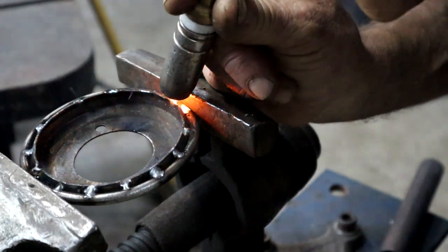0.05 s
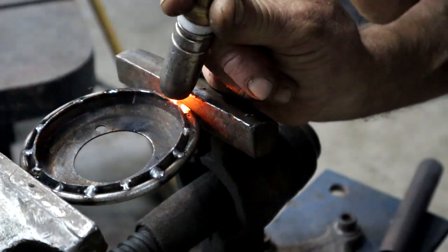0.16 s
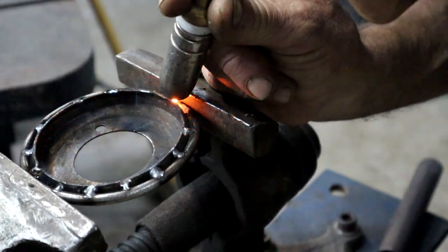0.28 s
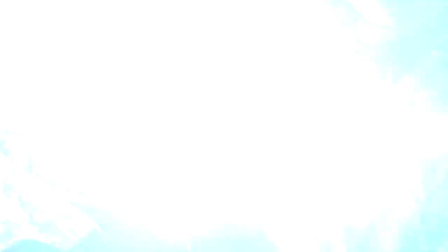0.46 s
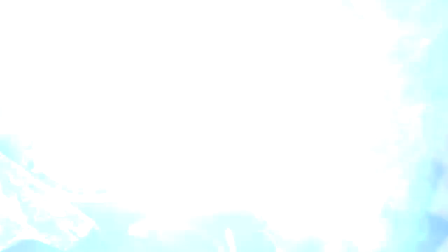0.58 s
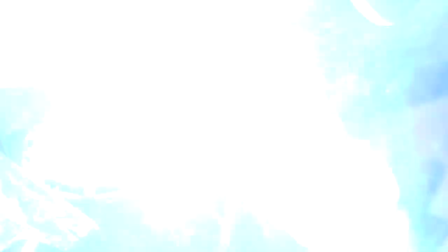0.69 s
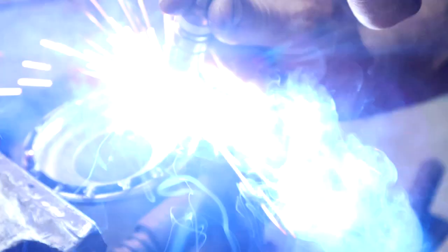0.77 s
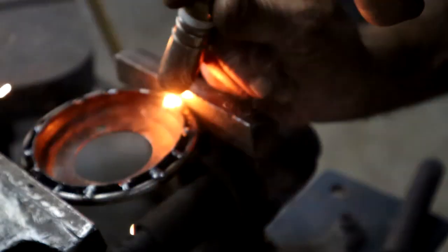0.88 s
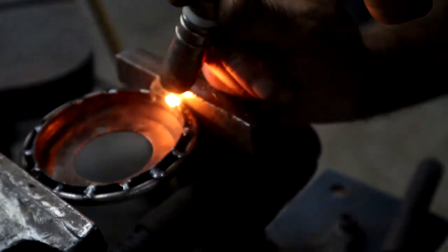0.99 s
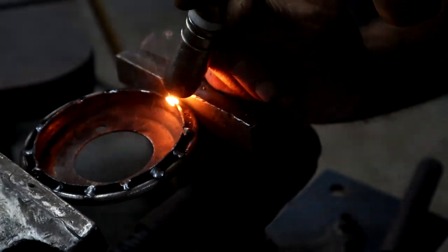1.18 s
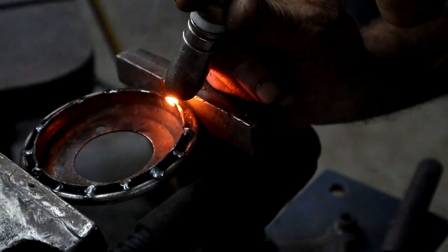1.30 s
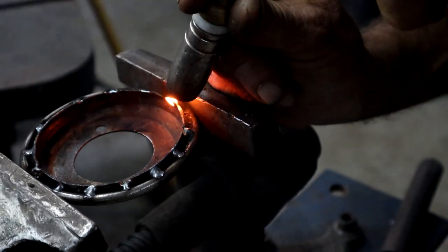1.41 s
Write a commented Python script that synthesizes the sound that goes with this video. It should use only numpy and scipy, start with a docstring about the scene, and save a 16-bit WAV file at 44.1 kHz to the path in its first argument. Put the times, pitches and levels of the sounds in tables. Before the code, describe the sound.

Arc welding close up in a workshop: faint machine hum, a rush of whistling shielding gas, then loud irregular snapping pops and gritty sizzle, ending with a soft gas puff and quiet hum; close, overloaded stereo microphone.

```python
"""A machine hums in a workshop; then shielding gas surges from a MIG torch and whistles in its pipe modes.
The arc catches with a hollow low knock in its first pop, then sputters in sharp pops while it fries; a gas puff fades.
Hum is wandering sines; gas is noise through resonances; the arc is pressure pulses, noise bursts and gritty noise.
A decaying-noise room answers gas and arc. Peaks drive a gain control, and the microphone overloads softly."""
import sys
import numpy as np
from scipy import signal
from scipy.fft import rfft, irfft, next_fast_len
from scipy.io import wavfile
from scipy.ndimage import minimum_filter1d, map_coordinates

SR = 44100
rng = np.random.default_rng(int(sys.argv[2]) if len(sys.argv) > 2 else 0)


def generate_wav(signal):
    """Clip the signal to [-1, 1] and save it as 16-bit WAV at the path in sys.argv[1]."""
    frames = np.transpose(np.atleast_2d(signal))
    scaled = np.clip(frames, -1, 1) * 32767
    pcm = np.round(scaled).astype(np.int16)
    wavfile.write(sys.argv[1], SR, pcm)


N = 63945  # samples

# Spectra are relative: each noise is scaled to rms 1 before its level is applied.
# Likeness is the left-right correlation, from -1 (opposite) to 1 (equal).

# Workshop background spectrum: (frequency [Hz], level [dB])
SHOP_COLOUR = [(25, -34), (60, -22), (100, -24.5), (155, -6), (213, -13), (257, -6.5), (335, -11),
               (515, -10.5), (640, -14.5), (1000, -14), (2430, -20.5), (3440, -36), (4400, -31),
               (10300, -50.5), (15000, -83)]
# Workshop background stereo: (frequency [Hz], likeness [-1 to 1])
SHOP_LIKENESS = [(60, 0.97), (250, 0.94), (600, 0.75), (1500, 0.067), (5000, 0.045)]
# Partials of the machine hum: (frequency [Hz], level [dB])
HUM_PARTIALS = [(165, -47), (198, -60.5), (259, -44.5), (296, -48), (511, -52.5), (878, -53), (1019, -50.5)]
SHOP_DB = -35.5

# Gas flow envelope: (time [s], level [dB])
GAS_LEVEL = [(.205, -92), (.212, -28.5), (.226, -26), (.283, -15.5), (.347, -15.5), (.368, -33),
             (.40, -6.5), (.435, -11), (.505, -15), (.53, -19), (.62, -52), (.82, -54), (.9, -89)]
# Nozzle pipe modes: (frequency [Hz], width [Hz], level [dB])
NOZZLE_MODES = [(1766, 360, -2), (5355, 600, -5.5), (8440, 780, -14), (9580, 530, -15), (11000, 900, -33)]
# Spans in which the nozzle sounds: (start [s], end [s], level of upper modes [dB])
SPEAKING_SPANS = [(0.224, .353, 1), (0.409, .525, -1.5)]
# Jet hiss spectrum: (frequency [Hz], level [dB])
JET_COLOUR = [(150, -42), (600, -28), (1200, -13), (2400, 0), (3600, -6), (5000, -15), (7000, -3.5),
              (9000, 2.5), (12000, 2.5), (13500, -11), (15500, -33)]
# Gas stereo: (frequency [Hz], likeness [-1 to 1])
GAS_LIKENESS = [(600, 0.22), (1800, 1), (3100, 0.27), (5300, 0.86), (8000, -0.21), (14000, -0.63)]
JET_DB, WHISTLE_DB = -6.5, -14  # relative to the gas envelope
WHISTLE_HZ, WHISTLE_WANDER = 1767, 0.0326  # centre; wander as a fraction of it
SPEAK_EDGE_S, MUTE_DB = 0.0064, -16.5  # speed of the span edges; nozzle level outside the spans
UPPER_HZ = 3200  # modes above this are the upper ones

# Room decay: (frequency [Hz], T60 [s])
ROOM_T60 = [(200, 0.25), (1500, 0.52), (5000, 0.88), (10000, 0.54), (15000, 0.24)]
# Room tail spectrum: (frequency [Hz], level [dB])
ROOM_COLOUR = [(100, -27), (450, -26), (900, 3.5), (1500, -3.5), (3000, -0.5), (6000, -1), (9500, 6.5),
               (11800, -0.5), (13200, 9), (15000, -26)]
# Room stereo: (frequency [Hz], likeness [-1 to 1])
ROOM_LIKENESS = [(200, 0.48), (550, 0.84), (1650, -0.28), (5000, -0.6), (15000, -0.65)]
ARC_WET_DB, GAS_WET_DB, ROOM_BUILD_S = -8, -7, 0.034

# Frying arc envelope: (time [s], level [dB])
FRY_LEVEL = [(.343, -70), (.35, -8), (.365, -8.5), (.41, -19), (.5, -31), (.515, -11.5), (.55, -8.5),
             (.59, -20.5), (.66, -13.5), (.79, -15.5), (.82, -29), (.89, -55)]
# Frying arc spectrum: (frequency [Hz], level [dB])
FRY_COLOUR = [(30, -26), (130, 3), (400, -2.5), (1800, 1.5), (3500, -5), (5300, -1.5), (7000, -7.5),
              (10000, -4), (11500, 0), (13000, -12), (15500, -19.5)]
# Arc stereo: (frequency [Hz], likeness [-1 to 1])
ARC_LIKENESS = [(250, 0.72), (2000, -0.34), (6000, -0.24), (12000, 0.035)]

# Wire touches that spit: (time [s], level [dB])
TOUCHES = [(0.3434, -3.5), (0.5073, -2), (0.524, 6.5), (0.5322, -14), (0.5564, -7)]
TOUCH_T60_S = 0.0078

# Arc strikes; the near side is shorter and the far side longer than the nominal length:
# (time [s], push [dB], crack [dB], nominal push length [ms], opening spike over push [ratio], left-right [dB])
POPS = [(0.3488, 9, 9.5, 0.5, 0.81, 10), (0.5104, 6.5, 2.5, 0.66, 1.5, 1), (.5342, 16, 7, 0.46, 1.54, -2.5),
        (0.5491, 11.5, 1.5, 0.58, 1.4, 5.2), (0.5671, 8.5, 4.5, 0.51, 1.53, 3.5),
        (0.6106, 10, 10, 0.85, 2.07, 6), (.6435, 13, 3.5, 0.46, 1.35, 7.5), (.6620, 12, 2, 0.4, 1.33, 6.5),
        (0.6808, 15, 3.5, 0.29, 1.2, 7), (0.7078, 15.5, 5.5, 0.34, 1.02, 6.5),
        (.7596, 21, 5.5, 0.27, 0.99, 5.5), (0.7791, 9.5, 1, 0.45, .9, 8)]
# Reversed pulses: the first is the short return swing of the opening pop, the others longer, dull thuds:
# (time [s], pull [dB], crack [dB], nominal pull length [ms], opening spike over pull [ratio], left-right [dB])
REVERSED_PULSES = [(.3499, 9, 4, 0.27, 1.3, 3.5), (.5269, 16.5, -2.5, 1.7, 0.52, 1.5),
                   (.5421, 9, -17, 1.5, 0.99, 0), (0.7301, -3, -10.5, 2.1, 1.5, -9),
                   (0.8021, 7, 0.5, 2.1, 0.68, -5.5)]
# Spectrum of cracks and spits: (frequency [Hz], level [dB])
CRACK_COLOUR = [(300, -3), (1000, -4), (1600, -6.5), (2600, -2), (3600, -4.5), (4500, -11), (6300, -12.5),
                (7200, -5), (9000, -13), (10500, -11.5), (11400, 5.5), (12400, -13), (15500, -13.5)]
FRONT_MS = 0.15  # nominal time to the peak of the opposite opening spike
CRACK_T60_S, CRACK_HOLD_S = 0.0066, 0.00024
TICK_LEAD_S, TICK_DB, TICK_T60_S = 0.0024, -8.5, 0.0018  # a tick just before each pulse
MIC_LOW_HZ = 80.6  # the microphone's bass limit

# Knock in the first pop: (frequency [Hz], level [dB], T60 [s])
KNOCK_MODES = [(408, 7, 0.018), (835, -1, .022)]
KNOCK_S = .3488  # with the first pop

# Droplet spectrum: (frequency [Hz], level [dB])
SPATTER_COLOUR = [(500, -27), (1300, 2), (3500, -6), (5000, -7), (15000, -31)]
SPATTER_DB, SPATTER_T60_S, SPATTER_GRIT_DB = -19.5, 0.054, 8.5  # level is relative to each crack

# Last gas puff spectrum: (frequency [Hz], level [dB])
PUFF_COLOUR = [(150, -43), (500, -12), (900, -6), (1500, 6), (2500, 1), (3800, -3), (5500, 1), (9000, -0.5),
               (11200, -1), (12600, -4), (14000, -38)]
PUFF_S, PUFF_DB, PUFF_RISE_DB_PER_S, PUFF_FALL_DB_PER_S = 0.897, -17, 263, 141  # peak time and level

THRESHOLD_DB, DEPTH_DB = 2, 17.5  # gain control: onset; limit of the fast stage's cut
ATTACK_S, HOLD_S, RELEASE_DB_PER_S = 0.0051, .05, 152
MEMORY_S, MEMORY_GAIN = 1.56, 1.89  # its slow stage
TOP_HZ = 15750  # band limit


def amp(db):
    """Level law: decibels to amplitude ratio."""
    return 10 ** (np.asarray(db) / 20)


def unit(x):
    """Power normalisation: scale to rms 1."""
    return x / np.sqrt(np.mean(x ** 2) + 1e-20)


def along(points, hz):
    """Logarithmic frequency interpolation of (Hz, value) points."""
    f, v = np.transpose(points)
    return np.interp(np.log(hz + 1), np.log(f + 1), v)


def curve(rows):
    """Linear time interpolation of (s, value) points."""
    return np.interp(np.arange(N) / SR, *np.transpose(rows))


def wobble(rate):
    """Smooth random modulation: a spline through `rate` random knots a second."""
    knots = rng.standard_normal(4096)
    return map_coordinates(knots, [np.arange(N) * rate / SR], mode="wrap")


def filtered(x, response):
    """Linear filtering: multiply the spectrum by a response of frequency."""
    m = next_fast_len(N + SR // 2)
    return irfft(rfft(x, m) * response(np.fft.rfftfreq(m, 1 / SR)), m)[..., :N]


def noise(colour, likeness):
    """Partial coherence: coloured stereo noise of rms 1 from independent mid and side."""
    def mid_side_response(hz):
        turn = np.arccos(np.clip(along(likeness, hz), -1, 1)) / 2
        return amp(along(colour, hz)) * [np.cos(turn), np.sin(turn)]

    mid, side = filtered(rng.standard_normal((2, N)), mid_side_response)
    return unit(np.array([mid + side, mid - side]))


def tone(hz, wander, rate):
    """Frequency modulation: a sine of rms 1 with randomly wandering pitch."""
    cycles = np.cumsum(hz * (1 + wander * wobble(rate))) / SR
    return np.sqrt(2) * np.sin(2 * np.pi * cycles)


def burst(t, hold, t60):
    """Exponential decay after a sudden start and a short hold."""
    return (t >= 0) * amp(-60 * np.maximum(t - hold, 0) / t60)


def hump(u):
    """Rounded pressure pulse that peaks at u = 1."""
    return u * np.exp(1 - u)


def shop():
    """Superposition: wavering machine partials add to broadband air rush."""
    hum = sum(amp(db + 2.6 * wobble(15.2)) * tone(hz, wander=0.01175, rate=28) for hz, db in HUM_PARTIALS)
    return hum + amp(SHOP_DB) * noise(SHOP_COLOUR, SHOP_LIKENESS)


def pipe_response(hz):
    """Resonance: the power of the nozzle's pipe modes adds."""
    power = sum(amp(db) ** 2 / (1 + np.abs(2 * (hz - centre) / width) ** 3.02)
                for centre, width, db in NOZZLE_MODES)
    return np.sqrt(power)


def gas():
    """Flow-excited resonance: a jet hisses, noise sounds the pipe modes; near the lowest a tone whistles."""
    t = np.arange(N) / SR
    gates = [(np.tanh((t - on) / SPEAK_EDGE_S) - np.tanh((t - off) / SPEAK_EDGE_S)) / 2
             for on, off, _ in SPEAKING_SPANS]
    upper_db = sum(gate * db for gate, (_, _, db) in zip(gates, SPEAKING_SPANS))
    modes = unit(filtered(noise([(1000, 0)], GAS_LIKENESS), pipe_response))  # from white noise
    upper = filtered(modes, lambda hz: hz > UPPER_HZ)
    whistle = amp(WHISTLE_DB + 1.3 * wobble(90)) * tone(WHISTLE_HZ, WHISTLE_WANDER, rate=430)
    speaking = amp(MUTE_DB * (1 - sum(gates)))
    nozzle = speaking * (modes - upper + amp(upper_db) * upper + whistle)
    jet = amp(JET_DB) * noise(JET_COLOUR, GAS_LIKENESS)
    return amp(curve(GAS_LEVEL) + 1.02 * wobble(200.9)) * (nozzle + jet)


def room(x):
    """Reverberation: the left input meets a noise tail that builds up, then decays at a rate set by frequency."""
    hz, t, z = signal.stft(noise(ROOM_COLOUR, ROOM_LIKENESS), SR, nperseg=256)
    decay = amp(-60 * t / along(ROOM_T60, hz)[:, None])
    build = 1 - np.exp(-t / ROOM_BUILD_S)
    tail = signal.istft(z * decay * build, SR, nperseg=256)[1]
    return signal.fftconvolve(x[:1], tail / np.linalg.norm(tail[0]), axes=1)[:, :N]


def fry():
    """Amplitude modulation: rapid random level swings make the burning arc's sizzle grainy."""
    grain = amp(5.7 * np.tanh(wobble(1400)))
    return amp(curve(FRY_LEVEL)) * unit(grain * noise(FRY_COLOUR, ARC_LIKENESS))


def touches():
    """Impulsive noise: wire touches spit short decaying bursts without a pressure pulse."""
    t = np.arange(N) / SR
    envelope = sum(amp(db) * burst(t - s, 0, TOUCH_T60_S) for s, db in TOUCHES)
    return envelope * noise(CRACK_COLOUR, ARC_LIKENESS)


def discharges(rows, sign):
    """Impulsive radiation: a tick, then a pulse and crack; the near pulse is taller and shorter."""
    pulses, cracks = np.zeros((2, 2, N))
    for s, pulse_db, crack_db, length_ms, front, pan_db in rows:
        t = np.arange(N) / SR - s
        near = amp(pan_db * np.array([[.5], [-.5]]))  # left, right
        age_ms = np.maximum(t, 0) * 1000 * near  # the near side runs through its pulse faster
        pulse = hump(age_ms / length_ms) - front * hump(age_ms / FRONT_MS)
        pulses += sign * amp(pulse_db) * near * pulse
        tick = amp(TICK_DB) * burst(t + TICK_LEAD_S, 0, TICK_T60_S)
        cracks += amp(crack_db) * (burst(t, CRACK_HOLD_S, CRACK_T60_S) + tick)
    return pulses, cracks * noise(CRACK_COLOUR, ARC_LIKENESS)


def thump(x, damping):
    """Second-order high-pass response: the microphone swings back after each pulse."""
    return filtered(x, lambda f: (1j * f) ** 2 / (MIC_LOW_HZ ** 2 - f * f + 1j * damping * f * MIC_LOW_HZ))


def knock():
    """Damped modal vibration: a damped 400 and 835 Hz knock colours the first pop."""
    t = np.maximum(np.arange(N) / SR - KNOCK_S, 0)
    return sum(amp(db - 60 * t / t60) * np.sin(2 * np.pi * hz * t) for hz, db, t60 in KNOCK_MODES)


def spatter():
    """Granular noise: a gritty shower of droplets decays after every pulse."""
    t = np.arange(N) / SR
    shower = sum(amp(SPATTER_DB + crack_db) * burst(t - s, 0, SPATTER_T60_S)
                 for s, _, crack_db, *_ in POPS + REVERSED_PULSES)
    grit = amp(SPATTER_GRIT_DB * np.clip(wobble(1500), -2, 2))
    return shower * unit(grit * noise(SPATTER_COLOUR, ARC_LIKENESS))


def puff():
    """Turbulent flow noise: a last diffuse puff of gas swells and fades exponentially."""
    t = np.arange(N) / SR - PUFF_S
    slope_db = np.minimum(PUFF_RISE_DB_PER_S * t, -PUFF_FALL_DB_PER_S * t)
    return amp(PUFF_DB + slope_db) * noise(PUFF_COLOUR, ROOM_LIKENESS)


def scene():
    """Superposition of machine, gas, arc and room."""
    pushes, pop_cracks = discharges(POPS, 1)
    pulls, pull_cracks = discharges(REVERSED_PULSES, -0.95)
    flow = gas()
    arc = pop_cracks + pull_cracks + spatter() + touches() + fry()
    tail = room(amp(ARC_WET_DB) * arc + amp(GAS_WET_DB) * flow)
    return shop() + flow + tail + arc + thump(pushes + pulls, damping=1.5) + knock() + puff()


def lag(v, seconds):
    """First-order relaxation towards v."""
    keep = np.exp(-1 / (seconds * SR))
    return signal.lfilter([1 - keep], [1, -keep], v)


def gain_control(x):
    """Dynamic compression: peaks cut the gain, which holds, recovers and keeps a slow memory of them."""
    t = np.arange(N) / SR
    peak_db = 20 * np.log10(np.abs(x).max(axis=0) + 1e-9)
    over_db = np.clip(3 * (peak_db - THRESHOLD_DB), 0, DEPTH_DB)
    fast_db = np.maximum.accumulate(over_db + RELEASE_DB_PER_S * t) - RELEASE_DB_PER_S * t
    hold = int(HOLD_S * SR)
    # the largest cut of the last HOLD_S
    held_db = -minimum_filter1d(-fast_db, hold, origin=(hold - 1) // 2, mode="nearest")
    return x * amp(-np.maximum(lag(held_db, ATTACK_S), MEMORY_GAIN * lag(held_db, MEMORY_S)))


def record(dry):
    """Saturation: gain control, then soft overload, then the band limit."""
    x = gain_control(dry)
    clipped = x / (1 + np.abs(x / .95) ** 6) ** (1 / 6)
    return filtered(clipped, lambda hz: hz < TOP_HZ)


dry = scene()
out = record(dry)
generate_wav(out)
```